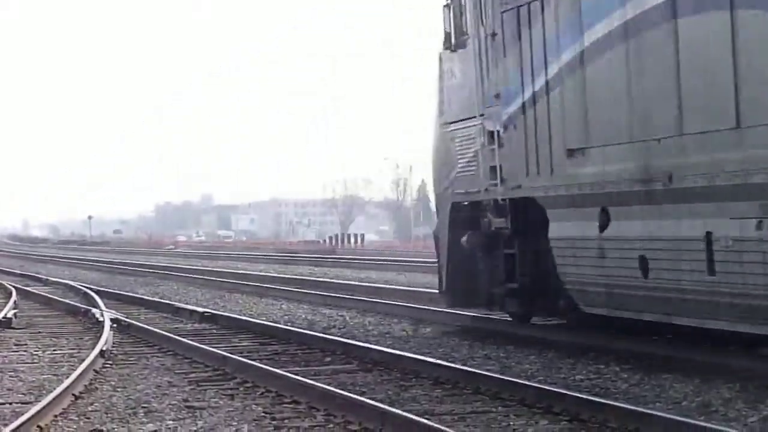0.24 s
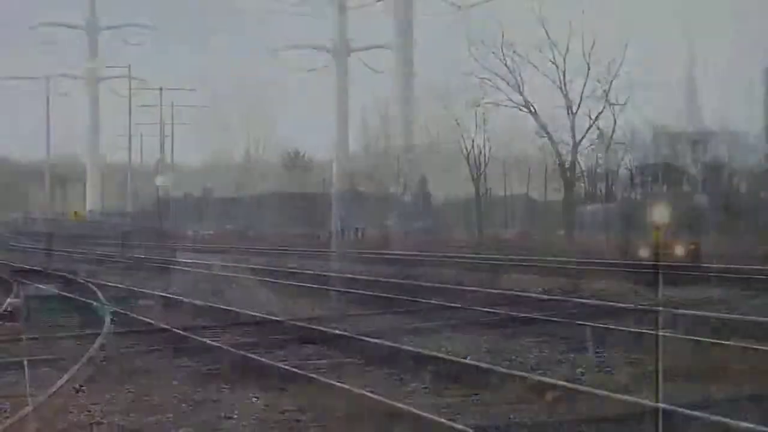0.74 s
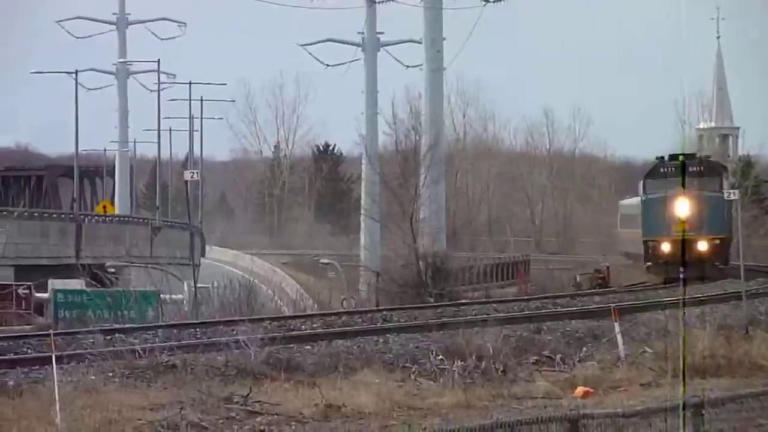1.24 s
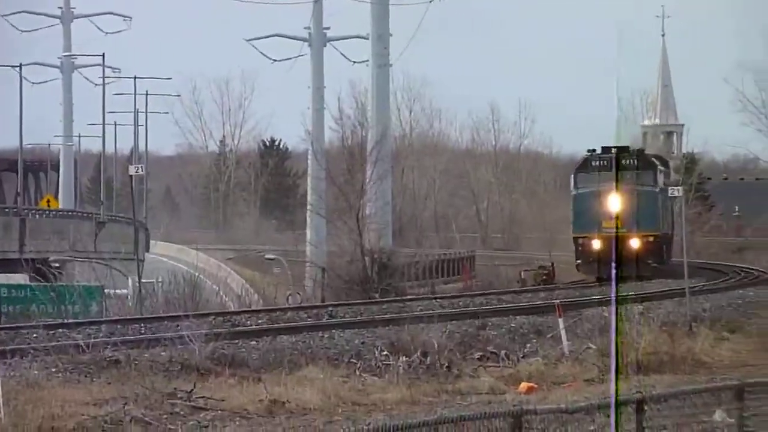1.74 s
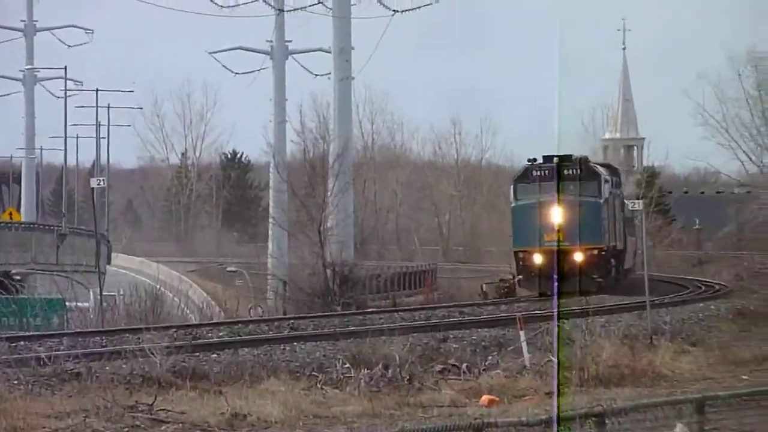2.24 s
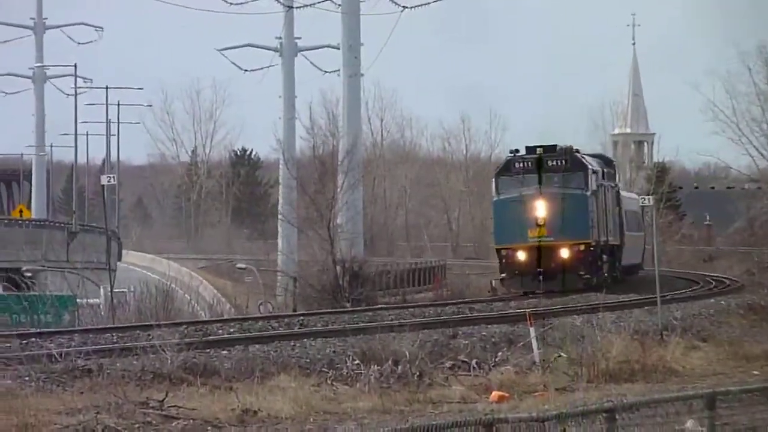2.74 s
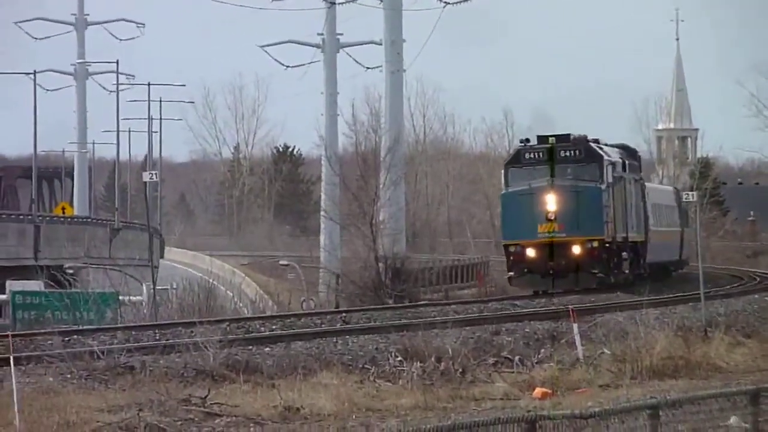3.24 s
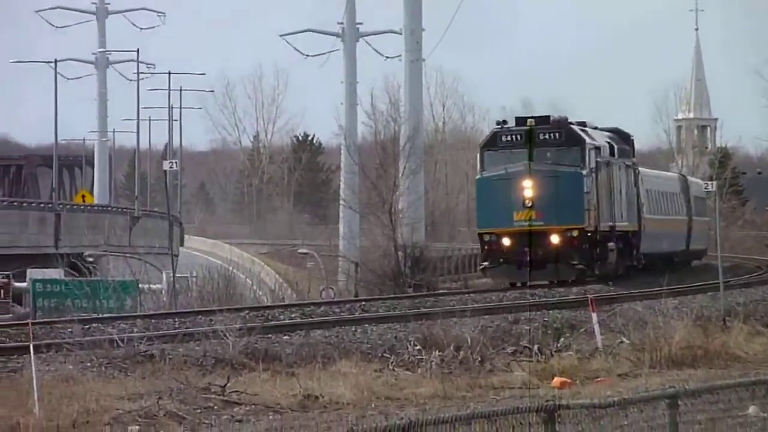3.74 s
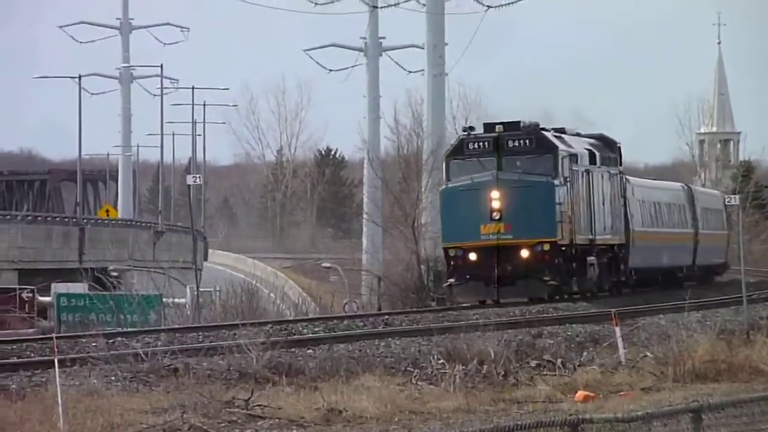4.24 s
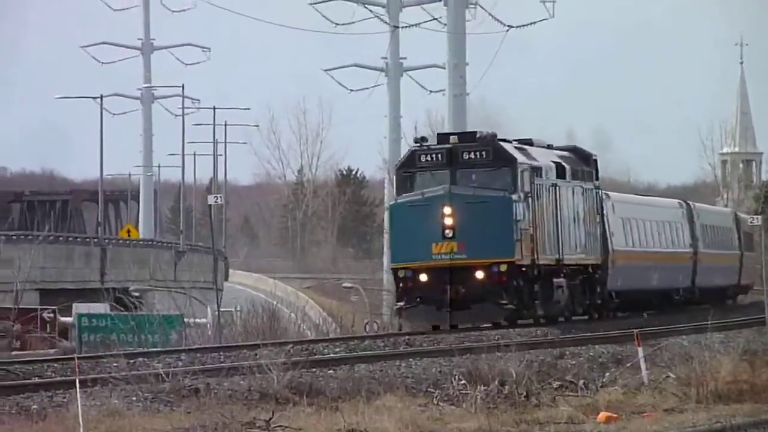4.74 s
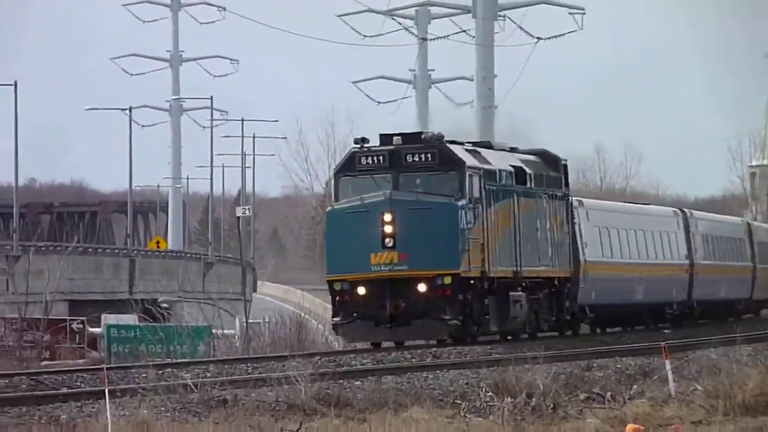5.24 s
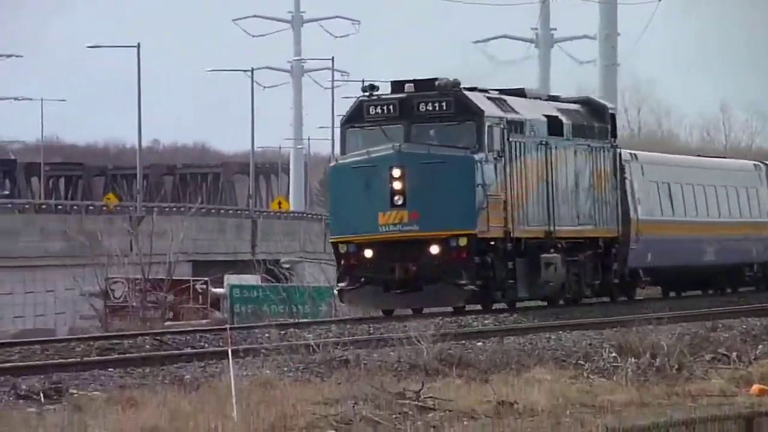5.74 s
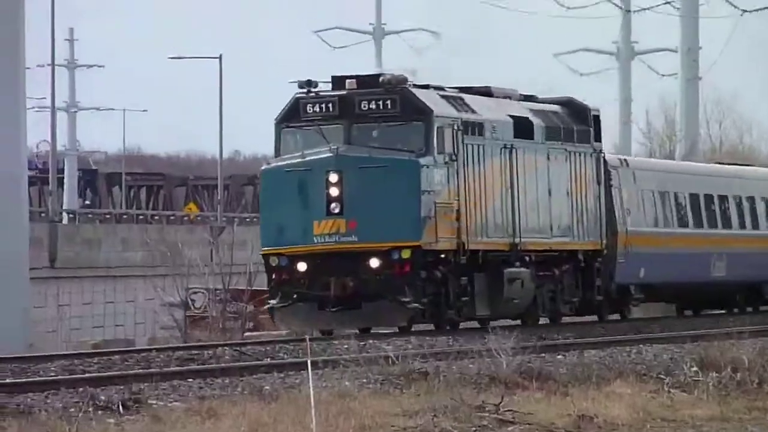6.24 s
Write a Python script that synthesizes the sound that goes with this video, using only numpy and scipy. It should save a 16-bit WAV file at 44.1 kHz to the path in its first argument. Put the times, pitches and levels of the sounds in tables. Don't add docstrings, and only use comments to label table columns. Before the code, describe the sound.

A close diesel locomotive whines and rumbles with rail knocks, cuts off, then a faint distant train throbs under whistling wind and handling bumps.

```python
import sys
import numpy as np
from scipy import signal
from scipy.io import wavfile
from scipy.ndimage import uniform_filter1d

SR = 44100
rng = np.random.default_rng(int(sys.argv[2]) if len(sys.argv) > 2 else 0)


def to_wav(s):
    ch = np.atleast_2d(s).T
    pcm = np.round(np.clip(ch, -1, 1) * 32767)
    wavfile.write(sys.argv[1], SR, pcm.astype(np.int16))


def how_loud(loudness_db):
    steps = np.asarray(loudness_db, float) / 20
    return 10 ** steps


N = 287091

# time in seconds, whine pitch in Hz, whine level in dB, engine load in dB.
NEAR_ENGINE = [
    (0.0, 1545, -23.5, -27.5),
    (0.134, 1538, -20, -24.5),
    (0.31, 1536, -25.5, -24),
    (0.5, 1525, -23.5, -22.5),
    (0.6, 1507, -31, -27.5),
    (0.67, 1522, -24, -24.5),
    (0.76, 1514, -29.5, -25.5),
    (0.9, 1479, -23.5, -20.5),
    (0.99, 1462, -24, -20),
]
# frequency in Hz, density in dB per Hz.
RUMBLE_COLOUR = [(20, -34), (40, -16), (70, -7), (150, -5.5), (250, 2), (400, -11), (570, -3.5),
                 (750, -10.5), (950, -13), (1400, -17.5), (1800, -32.5), (3000, -100)]
# frequency in Hz, density in dB per Hz.
CLATTER_COLOUR = [(940, -31.5), (1600, -5.5), (1620, -22.5), (1940, -10), (2180, -18), (3110, -18.5),
                  (3500, -24), (4550, -65), (7700, -120)]
# start in seconds, peak level in dB, pitch in Hz.
WHEEL_KNOCKS = [
    (0.119, -15, 289),
    (0.244, -8, 286),
    (0.485, -14, 277),
    (0.529, -11, 239),
    (0.589, -26, 156),
    (0.637, -9.5, 575),
    (0.661, -1, 337),
    (0.799, -9.5, 243.4),
    (0.933, -19, 231.6),
]
# time in seconds, drop in dB, half-width in seconds.
ECHO_NULLS = [
    (0.625, 9, 0.013),
    (0.73, 12, .022),
    (0.875, 14, 0.0086),
    (0.452, 9, 0.0072),
    (0.478, 9, .008),
    (0.952, 12, 0.01),
]
# multiple of the crank rate, level in dB.
CRANK_ORDERS = [(4, -22), (5, -16), (6, -14), (7, -17), (8, 0), (9, -8), (10, -17), (11, -13), (14, -17),
                (16, -21)]
# time in seconds, level in dB.
FAR_EFFORT = [(1.0, -38.5), (1.33, -44), (1.83, -38), (2.29, -37), (2.92, -31.5), (3.6, -41.5), (4.0, -38),
              (4.77, -34), (4.94, -40.5), (5.77, -31.5), (6.16, -32), (6.51, -34.5)]
# frequency in Hz, density in dB per Hz.
ROAR_COLOUR = [(290, -46.5), (500, -16.5), (573, -22), (657, 0), (690, 2), (734, -13.5), (796, -26),
               (879, -13.5), (971, -23), (1090, -26), (1200, -17), (1240, -25), (1350, -37.5),
               (1730, -38.5), (2200, -47.5), (2860, -81), (4840, -120)]
# frequency in Hz, density in dB per Hz.
GUST_COLOUR = [(10, -40), (30, -27.5), (50, -7.5), (110, -5.5), (185, -10), (255, -4), (400, -6), (600, -5),
               (780, -32.5), (1300, -100)]
# frequency in Hz, density in dB per Hz.
HISS_COLOUR = [(820, -45), (1400, -11), (1920, -13.5), (2010, -15), (2220, -11.5), (2440, -10.5),
               (3080, -7.5), (3500, -7), (4550, -42), (7700, -120)]
# time in seconds, level of the whistle bed in dB.
BREEZE_LEVEL = [(0.49, -21), (0.56, -31), (0.72, -21), (0.98, -31.5), (1.25, -26.5), (1.62, -29.5),
                (1.85, -26.5), (2.14, -28), (2.4, -23.5), (3.0, -28), (3.45, -28), (4.05, -31.5),
                (4.3, -26.5), (4.9, -31.5), (5.33, -26.5), (5.6, -33.5), (6.0, -27), (6.51, -28.5)]
# time in seconds, drop in dB, half-width in seconds.
BREEZE_LULLS = [(1.025, -1, 0.0094), (1.29, 6, 0.011), (1.70, 9, 0.026), (2.555, 9, 0.027),
                (2.77, 5, 0.022), (2.16, 5, 0.027), (2.635, 3.5, 0.022), (3.23, 1.5, 0.017),
                (4.55, 6.5, 0.021), (4.06, 3, 0.037), (4.32, 7, 0.035), (4.49, 5, 0.022), (4.95, 4, 0.024),
                (5.53, 4.5, 0.012), (6.36, 9, 0.022)]
# time in seconds, rise in dB, half-width in seconds.
PORT_BLOWS = [
    (1.33, 6, 0.033),
    (1.55, 5, 0.078),
    (2.06, 5.5, 0.099),
    (2.28, 6, 0.042),
    (2.87, 5, 0.077),
    (3.17, 3.5, 0.025),
    (4.64, 4, 0.071),
    (5.3, 3.5, .05),
    (5.8, 5.5, 0.087),
]
# start in seconds, peak level in dB, pitch in Hz, length in seconds.
STRONG_SWELLS = [(0.51, -17, 678, 0.022), (0.739, -15.5, 692.6, 0.053), (0.886, -12.5, 674, 0.041),
                 (1.038, -13, 673, 0.043), (1.227, -13.5, 657, 0.034), (1.252, -12.5, 711, 0.029),
                 (1.329, -10, 690, 0.022), (1.808, -14.5, 703, 0.047), (1.97, -14.5, 678, 0.033),
                 (2.015, -16, 726, 0.041), (2.273, -15, 653, 0.024), (2.487, -14, 682, 0.025),
                 (2.671, -18, 672, 0.054), (2.818, -17.5, 636, .024), (2.893, -10, 651, 0.026),
                 (3.049, -14.5, 662, 0.055), (3.316, -17, 674.4, 0.066), (3.536, -13, 698, 0.019),
                 (3.813, -15, 694, 0.037), (4.419, -11.5, 675, 0.018), (4.632, -17.5, 643, 0.033),
                 (4.775, -17, 670, 0.044), (5.144, -15, 723, 0.03), (5.385, -14, 716, 0.049),
                 (5.478, -16, 705, 0.026), (5.816, -10.5, 700, 0.022), (5.748, -20, 687, 0.042),
                 (6.165, -12, 697, 0.032), (6.22, -16.5, 706, 0.042), (6.437, -14, 703, 0.028)]
# start in seconds, peak level in dB, pitch in Hz, ring t60 in seconds.
HANDLING_TICKS = [(4.596, -28, 1310, 0.019), (4.641, -29, 1204, 0.015), (4.8209, -15, 1040, 0.01),
                  (4.8247, -1.5, 740, 0.0097), (4.8255, -10, 1217, 0.016), (4.8294, -19.5, 1250, 0.017),
                  (4.8406, -23, 1230, 0.027), (4.858, -27.5, 1110, 0.014), (4.8674, -31, 2300, 0.0081),
                  (4.8954, -20.5, 1260, .01), (5.2638, -17, 1300, 0.01), (5.267, -17.5, 940, 0.024),
                  (5.3027, -35.5, 1500, .012), (5.435, -34, 1300, 0.011), (5.8204, -26, 1500, .01),
                  (6.2376, -8, 425, 0.023), (6.2391, -12, 620, 0.017), (6.2394, -19.5, 1240, 0.013),
                  (6.4524, -27, 1200, .01)]
# start in seconds, peak level in dB, pitch in Hz, ring t60 in seconds.
GRIP_SCRAPE = [(3.5488, 8, 1120, 0.0027), (3.5512, -11.5, 1590, 0.0092), (3.552, -9, 740, 0.016),
               (3.673, -8.5, 1000, .008), (3.678, -4, 714, 0.014), (3.684, -16.5, 812, .01),
               (3.691, -0.5, 1180, 0.0053), (3.6955, -17, 1473, .008), (3.698, -21, 1300, 0.0043),
               (3.7003, -24, 1250, .0055), (3.704, -20, 1150, 0.006), (3.707, 4, 850, 0.003),
               (3.71, -8, 881, 0.021), (3.715, -18, 882, 0.013), (3.721, -25.5, 896, 0.0076)]
# start in seconds, peak level in dB, pitch in Hz.
SOFT_THUMPS = [
    (2.042, -27, 153),
    (2.279, -24, 271),
    (3.543, -20, 298),
    (3.68, -23.5, 320),
    (4.289, -20.5, 249),
    (4.819, -25, 484),
    (5.267, -18, 278),
    (5.819, -38.5, 380),
    (6.234, -11, 260),
]
# time in seconds, level in dB.
RASP_LEVEL = [(3.668, -52), (3.674, -42.5), (3.688, -44), (3.69, -26.5), (3.701, -14), (3.71, -24.5),
              (3.72, -47), (3.735, -63)]
# frequency in Hz, density in dB per Hz.
RASP_TONE = [(200, -12), (600, 0), (1100, 3), (2000, -3), (3000, -10), (3700, -27.5)]
# start in seconds, drop in dB, recovery in seconds.
GAIN_DUCKS = [
    (3.556, 9.5, 0.027),
    (3.724, 15.5, 0.23),
    (4.832, 3.5, .05),
]

FAR_ENTRY_S = 0.487
WHISTLE_HZ = 690
SHELTER_S = 3.72


def evened(x):
    return x / np.sqrt(np.mean(x ** 2) + 1e-20)


def columns(rows):
    s, *rest = np.transpose(rows)
    t = np.arange(N) / SR
    return [np.interp(t, s, c) for c in rest]


def bumps(rows):
    out = np.zeros(N)
    for s, db, half in rows:
        at = max(round((s - 0.3) * SR), 0)
        part = out[at:at + round(0.6 * SR)]
        away = (at + np.arange(len(part))) / SR - s
        part += db * np.exp(-(away / max(half, 0.004)) ** 2)
    return out


def wander(hz):
    lowpass = signal.butter(2, hz, fs=SR, output="sos")
    return evened(signal.sosfiltfilt(lowpass, rng.standard_normal(N)))


def noise(points, lo_hz, hi_hz, patchy_db, flicker_db, size=1024):
    hz = np.fft.rfftfreq(size, 1 / SR)
    frames = 4 * N // size + 5
    f, db = np.transpose(points)
    a, b, patches = rng.standard_normal((frames, len(hz), 3)).T
    patches = uniform_filter1d(patches, size=8, axis=0)
    patches = evened(uniform_filter1d(patches, size=8, axis=1))
    flicker = evened(uniform_filter1d(rng.standard_normal(frames), size=4))
    shape = np.interp(np.log(hz + 1), np.log(f + 1), db, -120, -120)
    z = (a + 1j * b) * how_loud(shape[:, None] + patchy_db * patches + flicker_db * flicker)
    in_band = (hz > lo_hz) & (hz < hi_hz)
    share = np.sum(abs(z[in_band]) ** 2) / np.sum(abs(z) ** 2)
    sound = signal.istft(z, nperseg=size, noverlap=size - size // 4)[1][:N]
    return evened(sound) / np.sqrt(share)


def resonate(x, hz, width_hz):
    turn = np.exp(2j * np.pi * np.cumsum(hz) / SR)
    r = np.exp(-np.pi * width_hz / SR)
    return 2 * (turn * signal.lfilter([1 - r], [1, -r], x / turn)).real


def rings(rows, spread):
    out = np.zeros(N + 4000)
    t = np.arange(4000) / SR
    for s, db, hz, t60 in rows:
        partner_hz = hz * (1.5 + 0.5 * rng.random())
        ring = np.sin(2 * np.pi * hz * t) + spread * np.sin(2 * np.pi * partner_hz * t)
        attack = (1 - np.exp(-t * hz * 6)) ** 2
        out[round(s * SR):][:4000] -= how_loud(db - 60 * t / max(t60, 0.001)) * ring * attack
    return out[:N]


def limited(x):
    lowpass = signal.firwin(401, 3680, window=("kaiser", 9), fs=SR)
    return signal.oaconvolve(x, lowpass, "same")


def blower_whine(hz, level_db):
    pitch = uniform_filter1d(hz, size=5000) + 2.3 * wander(30)
    level = how_loud(level_db - bumps(ECHO_NULLS) + 0.67 * wander(25))
    return np.sqrt(2) * np.sin(2 * np.pi * np.cumsum(pitch) / SR) * level


def engine_rumble(load_db):
    return how_loud(load_db) * noise(RUMBLE_COLOUR, 100, 560, patchy_db=0.0, flicker_db=1.5, size=512)


def clatter(load_db):
    level = how_loud(-37.5 + 0.68 * (load_db + 24))
    return level * noise(CLATTER_COLOUR, 1700, 3500, patchy_db=0.5, flicker_db=1.0, size=256)


def wheel_knocks():
    t60_s = 0.025
    return rings([(*knock, t60_s) for knock in WHEEL_KNOCKS], spread=0.5)


def near_locomotive():
    end_s, end_pressure = 0.9951, -0.2
    hz, whine_db, load_db = columns(NEAR_ENGINE)
    x = blower_whine(hz, whine_db) + engine_rumble(load_db) + clatter(load_db) + wheel_knocks()
    x = limited(x)
    end = round(end_s * SR)
    lead = np.exp(np.minimum(np.arange(N) - end, 0) / 12.0)
    return (x + (end_pressure - x[end]) * lead) * (np.arange(N) <= end)


def lesser_swells(bed_db):
    gap_s = 0.055
    slots = np.arange(FAR_ENTRY_S, N / SR - 0.1, gap_s)
    u = rng.uniform(-1, 1, (len(slots), 4))
    s = slots + gap_s * (1 + u[:, 0]) / 2
    level_db = bed_db[(s * SR).astype(int)] + 5 + 3 * u[:, 1]
    pitch_hz = WHISTLE_HZ + 38 * u[:, 2]
    length_s = 0.03 * (1 + 0.25 * u[:, 3])
    rows = np.transpose([s, level_db, pitch_hz, length_s])
    nearest_s = abs(s[:, None] - np.array(STRONG_SWELLS)[:, 0]).min(1)
    return [*rows[nearest_s > gap_s / 2]]


def whistle(bed_db):
    centre = WHISTLE_HZ + 10 * wander(3.3)
    fuzzy = resonate(rng.standard_normal(N), centre, 72)
    out = how_loud(bed_db) * evened(resonate(fuzzy, centre, 72))
    waver_hz = 12 * wander(30)
    for s, db, hz, length_s in STRONG_SWELLS + lesser_swells(bed_db):
        at = round((s - 0.006) * SR)
        part = out[at:at + round(np.clip(length_s, 0.015, 0.08) * SR)]
        u = np.linspace(0, 1, len(part))
        swell = np.sin(np.pi * u ** 0.87) ** 2
        pitch = 0.75 * hz + 0.248 * WHISTLE_HZ + waver_hz[at:at + len(part)]
        part += how_loud(db) * swell * np.sin(2 * np.pi * np.cumsum(pitch) / SR)
    return out


def rail_roar(bed_db, sheltered):
    roar = how_loud(bed_db - 10) * noise(ROAR_COLOUR, 820, 1350, patchy_db=2.5, flicker_db=2.0)
    roar -= 0.93 * resonate(roar, np.full(N, WHISTLE_HZ), 160)
    overtone = resonate(roar, np.full(N, 1184), 31)
    return roar + (0.45 - 0.67 * sheltered) * overtone


def wind_gusts(bed_db, sheltered):
    blows_db = bumps(PORT_BLOWS)
    gust_db = -38.5 + 0.18 * (bed_db + 27) + 1.2 * wander(8.3) + blows_db - 5 * sheltered
    gusts = how_loud(gust_db + 1.0) * noise(GUST_COLOUR, 130, 480, patchy_db=2.5, flicker_db=2.0)
    buffet_db = gust_db - 9 + 0.5 * blows_db - 5.5 * sheltered + 3.5 * wander(3.3)
    buffets = how_loud(buffet_db) * evened(resonate(wander(90), np.full(N, 55.0), 30))
    return gusts + buffets


def engine_throb():
    crank_hz, firing_order = 10.17, 8
    together_s = 6.145
    turns = (np.arange(N) / SR - together_s) * crank_hz
    lines = np.zeros(N)
    for k, db in CRANK_ORDERS:
        stray = rng.random() * (abs(k - firing_order) > 1)
        lines += how_loud(db + 0.8 * wander(2.4)) * np.cos(2 * np.pi * (k * turns + stray))
    exhaust_hz = np.full(N, 88.0)
    fuzz = resonate(rng.standard_normal(N), exhaust_hz, 33)
    fuzz = resonate(fuzz, exhaust_hz, 33)
    effort = how_loud(columns(FAR_EFFORT)[0] + 1.3 * wander(4.1))
    return effort * evened(evened(lines) + 0.3 * evened(fuzz))


def preamp_hiss():
    return how_loud(-52) * noise(HISS_COLOUR, 1500, 3700, patchy_db=0.3, flicker_db=0.2)


def handling():
    thumps = rings([(*thump, 0.03) for thump in SOFT_THUMPS], spread=0.3)
    ticks = rings(GRIP_SCRAPE + HANDLING_TICKS, spread=0.14)
    start_s, end_s = RASP_LEVEL[0][0], RASP_LEVEL[-1][0]
    rasp_db = columns([(0, -150), *RASP_LEVEL, (end_s + 0.0095, -150)])[0]
    rasp = noise(RASP_TONE, 200, 3700, patchy_db=2.5, flicker_db=0.0, size=256)
    rasp *= how_loud(rasp_db + 1.8 * wander(270)) * (np.arange(N) > start_s * SR)
    return rasp + ticks + thumps


def ducking():
    t = np.arange(N) / SR
    held_db = np.zeros(N)
    for s, db, recovery_s in GAIN_DUCKS:
        held_db += db * np.exp(-np.maximum(t - s, 0) / recovery_s) * (t > s)
    return uniform_filter1d(held_db, size=150)


def far_scene():
    t = np.arange(N) / SR
    sheltered = t > SHELTER_S
    bed_db = columns(BREEZE_LEVEL)[0] - bumps(BREEZE_LULLS)
    outside = whistle(bed_db) + rail_roar(bed_db, sheltered) + wind_gusts(bed_db, sheltered) + engine_throb()
    mix = outside * how_loud(-ducking()) + handling() + preamp_hiss()
    return limited(mix * (t > FAR_ENTRY_S))


def scene():
    return (near_locomotive() + far_scene())[None]


def top_cut(x):
    return signal.sosfilt(signal.butter(12, 15800, fs=SR, output="sos"), x)


def record(dry):
    offset, dither = 0.003, 8e-6
    mix = dry + offset + dither * rng.standard_normal(N)
    return top_cut(mix)


dry = scene()
out = record(dry)
to_wav(out)
```